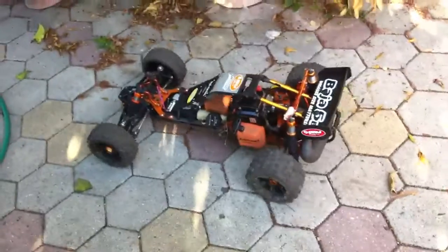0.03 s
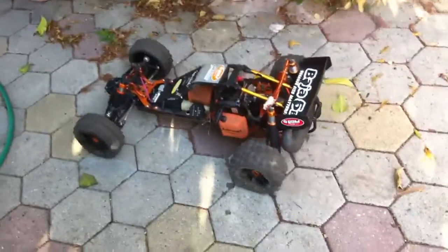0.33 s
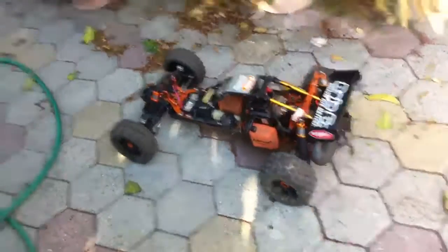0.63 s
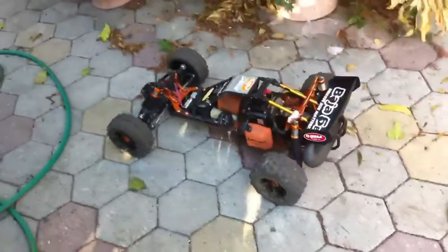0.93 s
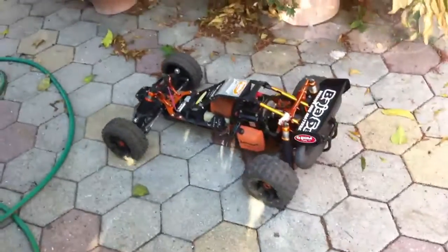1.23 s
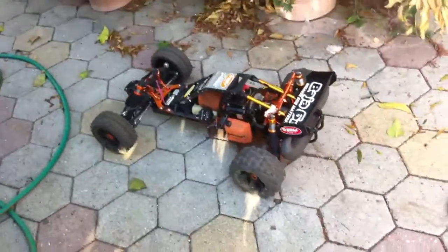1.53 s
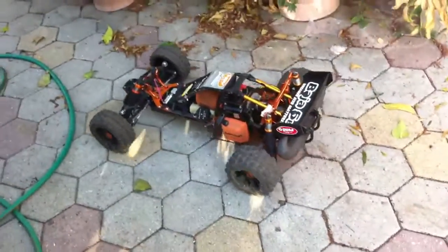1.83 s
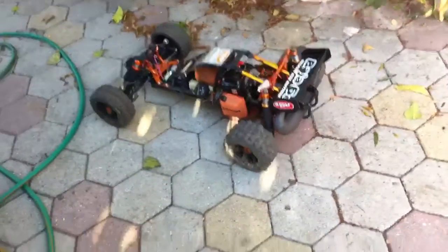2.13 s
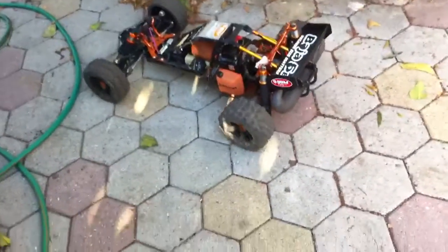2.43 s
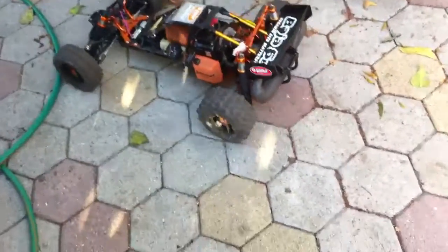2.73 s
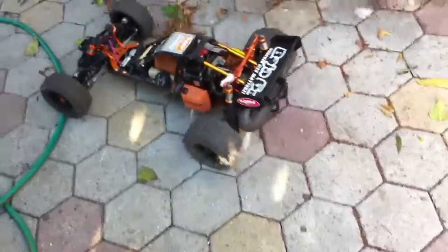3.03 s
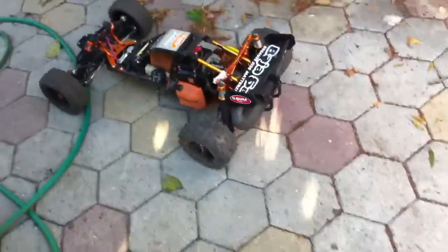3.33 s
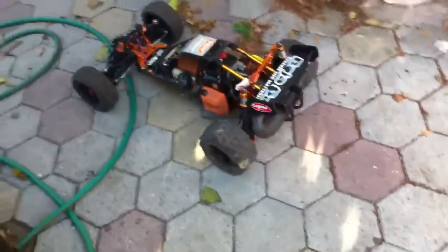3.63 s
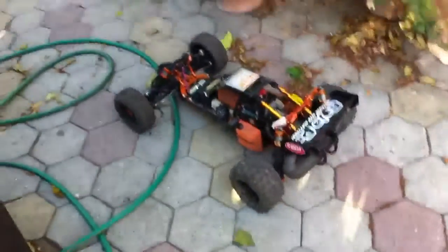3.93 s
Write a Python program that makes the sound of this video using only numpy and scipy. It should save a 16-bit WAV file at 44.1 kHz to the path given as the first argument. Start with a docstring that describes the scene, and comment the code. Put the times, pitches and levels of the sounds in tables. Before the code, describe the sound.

A model buggy's small two-stroke engine revs in six short, crackling blips outdoors.

```python
"""A model buggy's small two-stroke engine, blipped again and again on a paved yard a metre or two away.
Under throttle every turn fires with a sharp exhaust crack; between blips the engine coasts down,
humming and clattering, until it burbles and pops at idle. Air hisses and the drive rings faintly.
The paving and nearby walls throw the cracks back."""
import sys
import numpy as np
from scipy import signal
from scipy.fft import rfft, irfft
from scipy.io import wavfile
from scipy.ndimage import uniform_filter1d

SR = 44100
rng = np.random.default_rng(int(sys.argv[2]) if len(sys.argv) > 2 else 0)


def dump_mix(stems):
    """Bounce the given channels to the path in sys.argv[1] as a 16-bit WAV at rate SR."""
    frames = np.atleast_2d(stems).T  # one column per channel
    limited = np.clip(frames, -1, 1)  # hard clip at full scale
    pcm = np.round(limited * 32767).astype(np.int16)
    wavfile.write(sys.argv[1], SR, pcm)


N = 176400

# crank speed (time [s], speed [turns/s])
CRANK_SPEED = [(0.0, 102.4), (0.08, 163), (0.11, 166), (0.21, 131), (0.29, 119), (0.72, 73.6), (0.75, 74),
               (0.79, 86), (0.82, 118), (0.87, 152), (0.9, 153), (0.95, 128), (1.14, 106.3), (1.37, 80),
               (1.38, 77.5), (1.46, 126), (1.49, 145), (1.5, 147), (1.56, 129.6), (1.75, 110.5), (1.8, 108),
               (1.82, 98), (1.86, 128), (1.89, 148), (1.9, 165), (1.95, 150.0), (2.0, 133.5), (2.1, 117),
               (2.44, 81.8), (2.45, 84), (2.47, 95), (2.52, 135), (2.55, 147), (2.56, 159.1), (2.6, 157),
               (2.68, 136), (2.78, 133), (2.96, 108.5), (2.99, 111.5), (3.04, 170), (3.06, 169),
               (3.09, 157), (3.2, 137), (3.32, 115.5), (3.39, 114), (3.56, 98.4), (3.78, 82), (3.85, 77),
               (3.91, 82.5), (4.0, 67)]
REF_HZ = 120  # crank speed at octave 0


def undb(db):
    """Decibels to gain."""
    return 10 ** (np.asarray(db) / 20)


def unit(x):
    """Scale to rms 1."""
    return x / np.sqrt(np.mean(x ** 2))


def curve(rows, t):
    """Straight lines through (time [s], value) rows."""
    return np.interp(t, *np.array(rows).T)


def walk(rate_hz):
    """Smooth random drift, rms 1."""
    hold = int(SR / rate_hz)
    steps = np.repeat(rng.standard_normal(N // hold + 1), hold)
    return unit(uniform_filter1d(steps, hold)[:N])


def colour(x, response, size=4096):
    """Minimum-phase filter from (frequency [Hz], gain [dB]) rows."""
    hz, db = np.array(response).T
    bins_hz = np.maximum(np.arange(size // 2 + 1) * SR / size, 1)
    gain = undb(np.interp(np.log(bins_hz), np.log(hz), db))
    cepstrum = irfft(np.log(gain))
    cepstrum[1:size // 2] *= 2
    cepstrum[size // 2 + 1:] = 0
    return signal.fftconvolve(x, irfft(np.exp(rfft(cepstrum))))[:N]


def clicks(times_s, sizes, half_width=6):
    """Band-limited impulses."""
    at = np.asarray(times_s)[:, None] * SR
    index = np.floor(at).astype(int) + np.arange(1 - half_width, half_width + 1)
    shape = np.sinc(index - at) * np.cos(np.pi * (index - at) / (2 * half_width)) ** 2
    inside = (index >= 0) & (index < N)
    return np.bincount(index[inside], (shape * sizes[:, None])[inside], N)


def yard(x, wall_delay_s=.0011, low_cut_hz=540):
    """Dense reflections, a quick cluster and a weak tail; the pattern shifts as buggy and listener move."""
    decays = [(.084, 4), (.65, -8)]  # near, far (T60 [s], level [dB])
    t = np.arange(SR // 2) / SR
    power = sum(undb(db) ** 2 * 1e-6 ** (t / t60_s) / t60_s for t60_s, db in decays)
    onset = np.clip(t / wall_delay_s - 1, 0, 1)
    envelope = onset * np.sqrt(power * np.log(1e6) / SR)
    shares = np.array([walk(30) for _ in range(4)])
    shares /= np.sqrt(np.sum(shares ** 2, axis=0))
    out = sum(signal.fftconvolve(x * share, envelope * rng.standard_normal(len(t)))[:N] for share in shares)
    return signal.sosfilt(signal.butter(1, low_cut_hz, "high", fs=SR, output="sos"), out)


def drive_rings(t, waver_db=1.5):
    """Lightly rubbing metal parts of the drive sing on and off."""
    # metal resonances (frequency [Hz], width [Hz])
    modes = [(1690, 66), (2720, 290), (7990, 110), (9650, 140)]
    # (time [s], level of each of the four modes [dB])
    mode_levels = [(0, -59, -56, -52, -56), (.4, -39.5, -36, -65, -48), (.7, -38, -40.5, -62, -45.5),
                   (.95, -41, -42, -47, -44.5), (1.2, -40, -38.5, -60, -46), (1.6, -42.5, -34, -58, -63),
                   (2.05, -43, -44, -39.5, -47), (2.3, -31.5, -46, -67, -53), (2.75, -45, -43, -42, -48),
                   (3.2, -39.5, -39.5, -44, -53), (3.5, -41, -46, -70, -54), (3.75, -42, -42.5, -65, -71),
                   (4, -30.5, -35, -68, -49)]
    times_s, *levels_db = np.array(mode_levels).T
    out = 0
    for (hz, width_hz), db in zip(modes, levels_db):
        band = signal.iirpeak(hz, hz / width_hz, fs=SR)
        ring = signal.lfilter(*band, signal.lfilter(*band, rng.standard_normal(N)))
        out += unit(ring) * undb(np.interp(t, times_s, db) + waver_db * walk(9.7))
    return out


def air_hiss(t, turns, octaves, base_db=-36.5, db_per_octave=4.5, pulse_depth=.22):
    """Intake and cooling air rush, pulsing once a turn and growing with speed."""
    # air spectrum (frequency [Hz], gain [dB])
    spectrum = [(30, -72), (90, -25), (170, -3.5), (600, 0.5), (1200, -3.5), (2800, 3.5), (3700, -2),
                (5000, 1), (7000, -6), (8300, 0.5), (9200, -3.5), (12000, -1.5), (15500, -9)]
    # swell of the rush (time [s], gain [dB])
    swell = [(0, 3), (.6, -1.5), (1.2, 0.5), (1.7, 1), (2.3, 0.5), (2.9, 1.5), (3.3, -2), (3.6, -4),
             (4, 2.5)]
    air = unit(colour(rng.standard_normal(N), spectrum))
    pulse = 1 + pulse_depth * np.cos(2 * np.pi * turns)
    return air * pulse * undb(base_db + db_per_octave * octaves + curve(swell, t))


def piston_hum(turns, base_db=-45, wobble_db=2.4, roughness=.22):
    """The piston pumps air through the pipe: slightly rough harmonics of the crank speed."""
    # pumping tones (multiple of crank speed, level [dB])
    orders = [(1, -7), (2, 0), (3, -12), (4, -.5), (5, -9), (6, -7), (7, -6), (8, -1), (9, 0), (10, -2),
              (11, -5), (12, 0), (13, -7), (14, -8)]
    # pipe response (frequency [Hz], gain [dB])
    pipe = [(60, -22), (90, -12), (120, -6), (150, -1), (200, -5), (275, 2.5), (370, -5), (450, -1),
            (510, -2), (570, 4), (720, -4), (880, 0), (980, 1), (1060, 9.5), (1160, 2.5), (1300, -3),
            (2200, -6)]
    tones = 0
    for order, db in orders:
        strength = undb(db + wobble_db * walk(18)) * (1 + roughness * walk(110))
        phase = 2 * np.pi * (order * turns + rng.random()) + roughness * walk(110)
        tones += strength * np.sin(phase)
    return undb(base_db) * np.sqrt(2) * colour(tones, pipe)


def clatter(t, turns, per_turn=9, base_db=-32, scatter_db=3.5, drift_db=1.5, jitter_s=.00007):
    """Piston, bearings and clutch knock at the same angles of every turn and ring the crankcase."""
    # crankcase response (frequency [Hz], gain [dB])
    crankcase = [(30, -62), (100, -33), (400, -18), (700, -14), (880, -6), (980, -7.5), (1070, -1),
                 (1280, -1.5), (1560, 1), (1690, -5.5), (1930, -4), (2300, 0.5), (2500, -4), (2730, -4.5),
                 (3100, -4), (3600, -12), (6000, -15.5), (15000, -29)]
    # swell of the clatter (time [s], gain [dB])
    swell = [(0, 3.5), (.3, -1.5), (.7, 1), (1.2, 1), (1.7, -3), (2.3, 1), (2.8, 0), (3.2, -4),
             (3.55, -1.5), (4, 1)]
    angles = (np.arange(per_turn) + rng.random(per_turn)) / per_turn
    whole_turns = np.arange(int(turns[-1]))
    late, scatter, wander = rng.standard_normal((len(whole_turns), 3, per_turn)).swapaxes(0, 1)
    knock_s = np.interp(whole_turns[:, None] + angles, turns, t)
    looseness = (REF_HZ / curve(CRANK_SPEED, knock_s)) ** 1.5
    knock_s += jitter_s * looseness * late
    drift = unit(uniform_filter1d(wander, size=16, axis=0))
    polarity = np.sign(rng.standard_normal(per_turn))
    sizes = polarity * undb(drift_db * drift + scatter_db * scatter)
    knocks = colour(clicks(knock_s.ravel(), sizes.ravel()), crankcase)
    return unit(knocks) * undb(base_db + curve(swell, t))


def burble(port_open_s, idle_below_hz=100, fade_hz=16, gain_db=3, jitter_s=.0009):
    """Near idle the engine fires weakly, early or late and with uneven force."""
    # weak firing spectrum (frequency [Hz], gain [dB])
    spectrum = [(40, -50), (110, -22), (165, 0), (260, 1.5), (330, -2), (430, -9), (700, -8), (1000, -2),
                (1500, -11), (3000, -29)]
    scatter, late = rng.standard_normal((len(port_open_s), 2)).T
    force = .8 + .7 * np.tanh(scatter)
    idle = np.clip((idle_below_hz - curve(CRANK_SPEED, port_open_s)) / fade_hz, 0, 1)
    return undb(gain_db) * colour(clicks(port_open_s + jitter_s * late, idle * force), spectrum)


def exhaust(port_open_s):
    """Each firing leaves the pipe as a sharp crack and a duller thump; returns both."""
    # throttle blips, every turn fires (start [s], end [s], crack gain [dB], thump gain [dB])
    blips = [(.003, .115, 1, 5), (0.78, 0.902, -0.5, 0), (1.403, 1.521, 0, -2.5), (1.831, 1.930, 0.5, -2),
             (2.471, 2.603, 0, 1.5), (2.986, 3.104, -3.5, 0)]
    # single firings as the engine catches or idles (time [s], level [dB])
    single_firings = [(0.65, -8.5), (.755, 4), (.767, 0), (0.777, -15), (1.391, 4.5), (1.769, -3.5),
                      (1.808, 2), (1.818, 1.5), (2.456, 3), (2.712, -1), (2.722, 3.5), (2.744, 0),
                      (2.752, 0), (2.760, -1), (2.961, -6), (2.971, 1), (3.334, 1.5), (3.352, -2.5),
                      (3.361, 0), (3.670, -5), (3.818, -11.5), (3.884, -6.5), (3.939, -5.5), (3.995, -8.5)]
    # shock spectrum (frequency [Hz], gain [dB])
    crack_spectrum = [(30, -29.5), (150, -1.5), (450, -10), (750, -6), (1200, 6.5), (1450, -3.5), (1750, 4),
                      (2100, -0.5), (2750, 4), (3600, -1.5), (5200, 1.5), (7300, -3), (8200, -0.5),
                      (10500, -4.5), (15500, -7)]
    # pipe thump spectrum (frequency [Hz], gain [dB])
    thump_spectrum = [(30, -30), (90, -34), (155, 2), (240, 1), (330, -3.5), (460, -13.5), (650, 0.5),
                      (850, 4), (1100, 5), (1500, -11), (3000, -12)]
    # early echoes off paving and chassis (delay [s], gain [linear])
    echoes = [(.00076, 0.18), (.0023, 0.19)]
    crack_db, crack_db_per_octave = 6.5, 1.5
    thump_db, thump_db_per_octave = 9.5, -14.5
    scatter_db, jitter_s, throttle_close_s = 1.3, .00005, .038
    pop_gain_db, dull_above_hz = 5.5, 12000

    crank_hz = curve(CRANK_SPEED, port_open_s)
    octaves = np.log2(crank_hz / REF_HZ)
    scatter, late = rng.standard_normal((len(port_open_s), 2)).T
    crack_sizes, thump_sizes = 0, 0
    for start_s, end_s, blip_crack_db, blip_thump_db in blips:
        opening = np.clip((port_open_s - start_s) * crank_hz + .5, 0, 1)
        closing = np.clip((end_s - port_open_s) / throttle_close_s, 0, 1)
        force = opening * closing * undb(scatter_db * scatter)
        crack_sizes += force * undb(crack_db + blip_crack_db + crack_db_per_octave * octaves)
        thump_sizes += force * undb(thump_db + blip_thump_db + thump_db_per_octave * octaves)

    pop_s, pop_db = np.array(single_firings).T
    pop_sizes = undb(pop_db + pop_gain_db)
    pops = clicks(pop_s, pop_sizes)
    steep = clicks(pop_s, pop_sizes * undb(np.minimum(pop_db, 0)))  # weak pops are duller
    rounded = signal.lfilter(*signal.butter(1, dull_above_hz, fs=SR), pops - steep)

    fronts = clicks(port_open_s + jitter_s * late, crack_sizes) + steep + rounded
    cracks = colour(fronts, crack_spectrum)
    cracks += sum(gain * np.pad(cracks, (int(delay_s * SR), 0))[:N] for delay_s, gain in echoes)
    thumps = colour(clicks(port_open_s, thump_sizes) + pops, thump_spectrum)
    return cracks, thumps


def scene(thump_send_db=-7, knock_send_db=-7.5):
    """Crank speed paces the engine; the yard reflects its exhaust and clatter."""
    t = np.arange(N) / SR
    crank_hz = curve(CRANK_SPEED, t)
    turns = np.cumsum(crank_hz) / SR
    octaves = np.log2(crank_hz / REF_HZ)
    drone = piston_hum(turns) + air_hiss(t, turns, octaves) + drive_rings(t)
    knocks = clatter(t, turns)
    port_open_s = np.interp(np.arange(int(turns[-1])) + .5, turns, t)
    cracks, thumps = exhaust(port_open_s)
    thumps += burble(port_open_s)
    reflected = yard(cracks + undb(thump_send_db) * thumps + undb(knock_send_db) * knocks)
    return (drone + knocks + cracks + thumps + reflected)[None]


def record(dry, ceiling=.72, low_cut_hz=45, high_cut_hz=15800):
    """The microphone rounds the tallest spikes; deep bass and top are cut."""
    rounded = ceiling * np.tanh(dry / ceiling)
    highpass = signal.butter(2, low_cut_hz, "high", fs=SR, output="sos")
    lowpass = signal.ellip(10, .2, 80, high_cut_hz, fs=SR, output="sos")
    return signal.sosfilt(lowpass, signal.sosfilt(highpass, rounded))


dry = scene()
out = record(dry)
dump_mix(out)
```